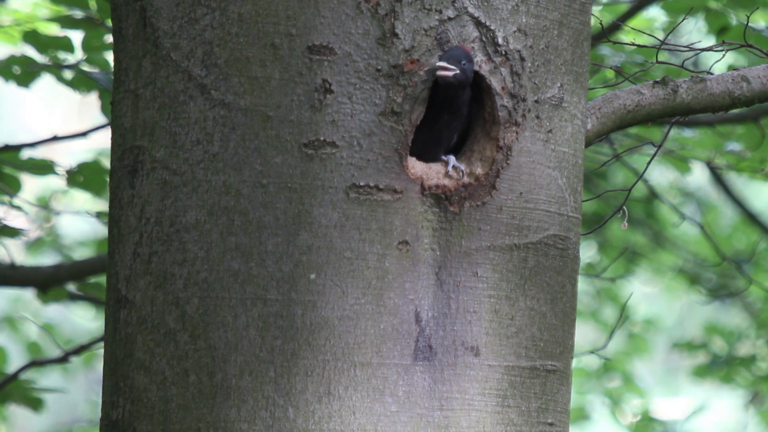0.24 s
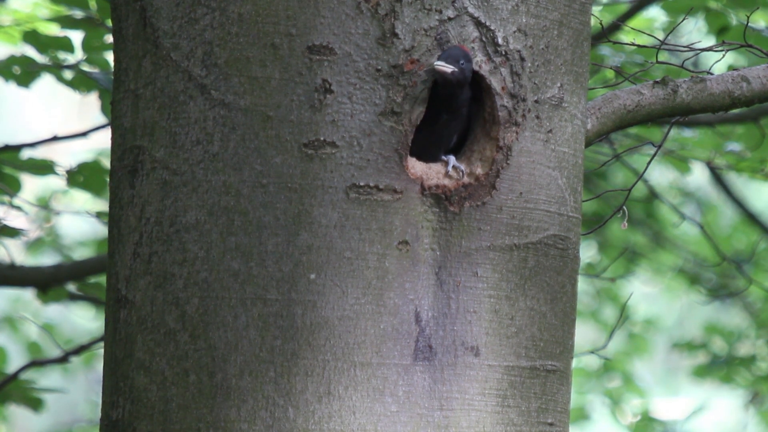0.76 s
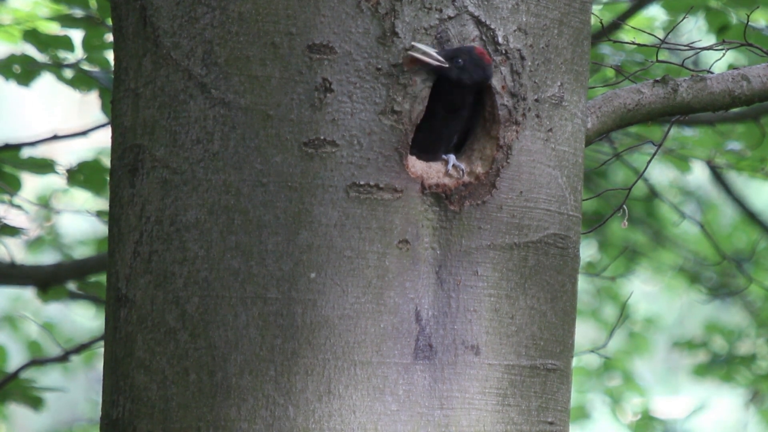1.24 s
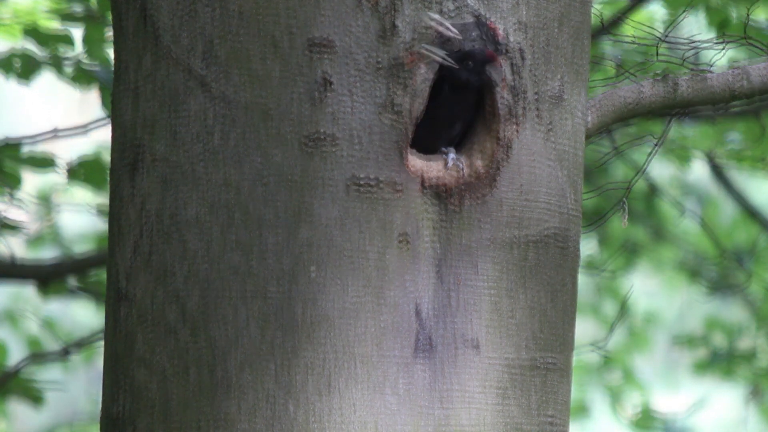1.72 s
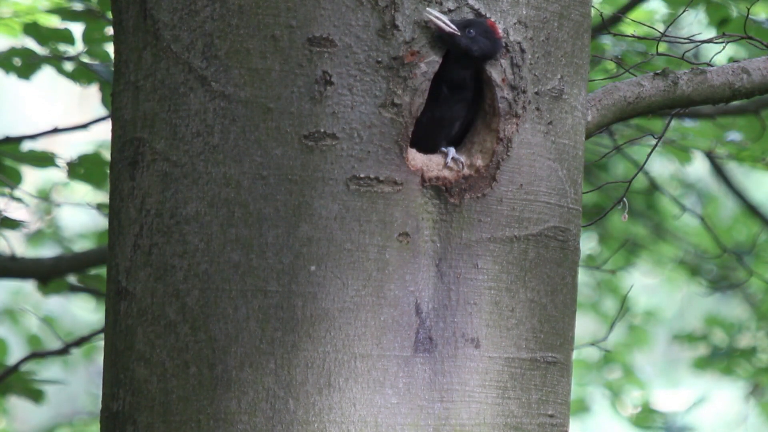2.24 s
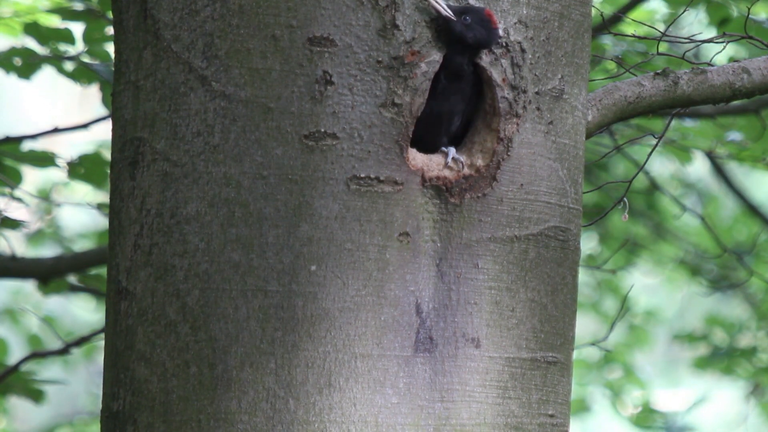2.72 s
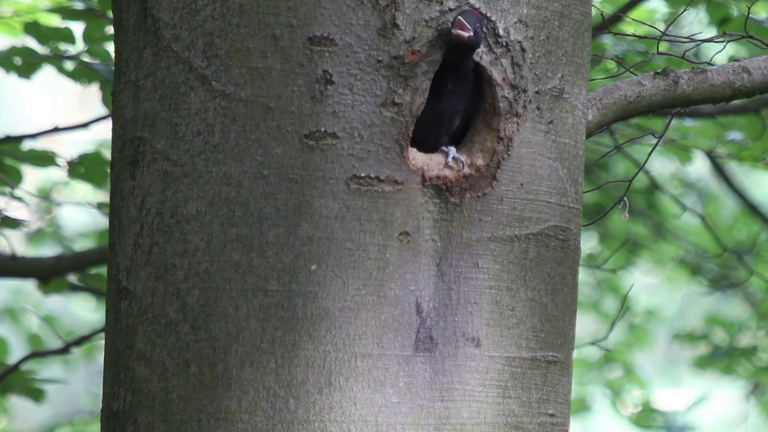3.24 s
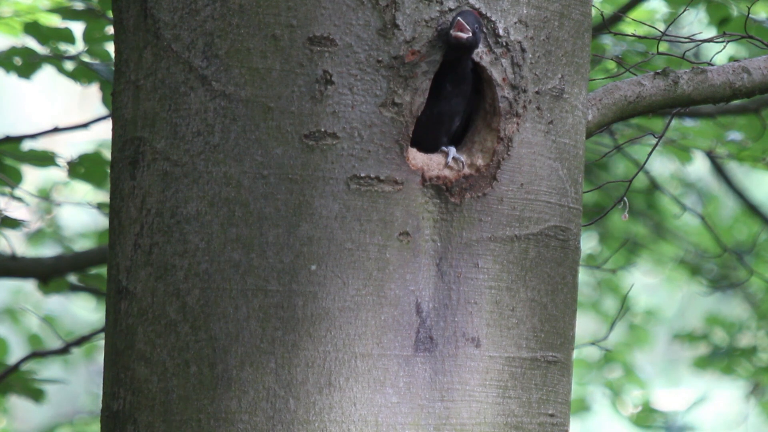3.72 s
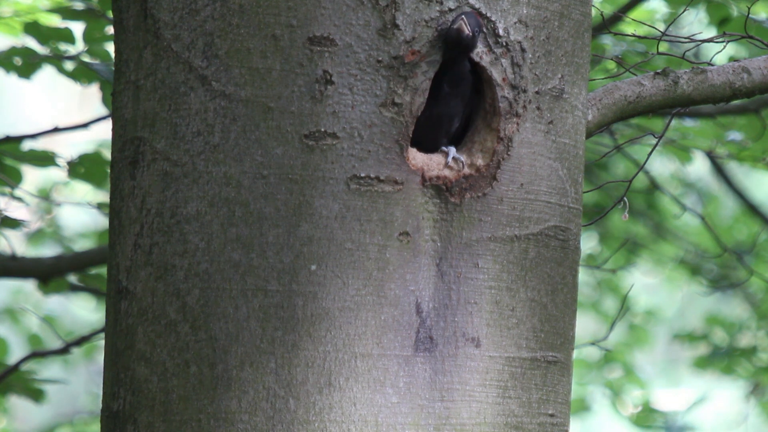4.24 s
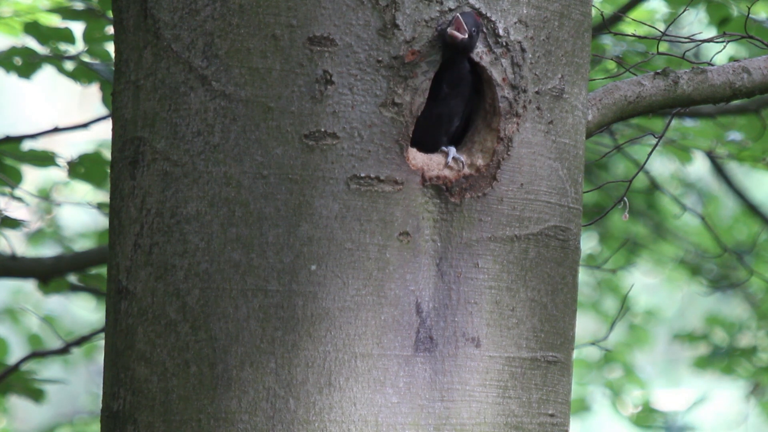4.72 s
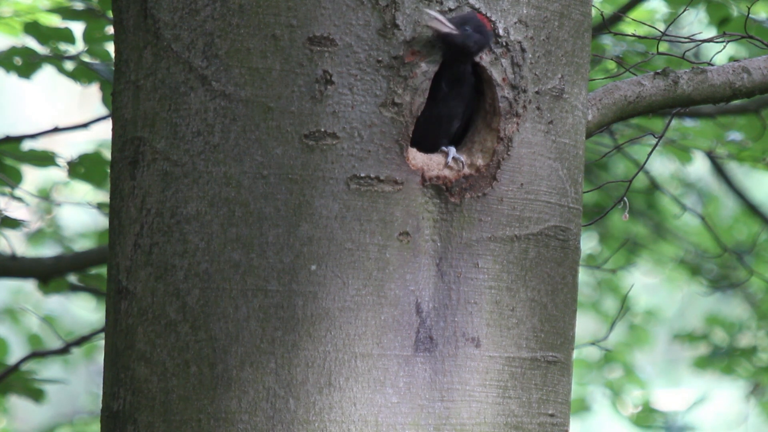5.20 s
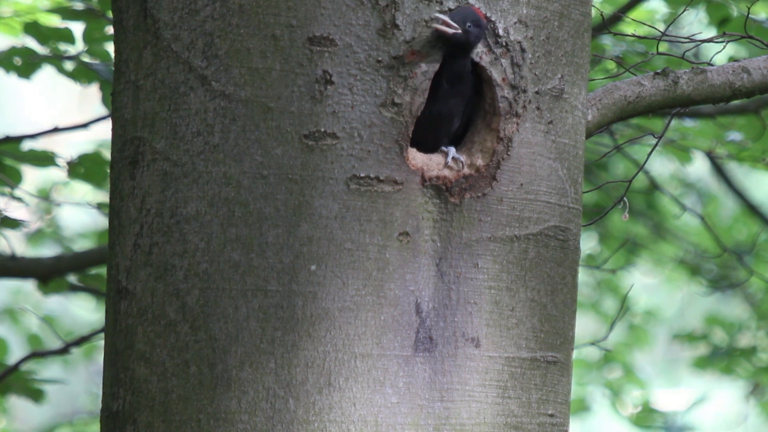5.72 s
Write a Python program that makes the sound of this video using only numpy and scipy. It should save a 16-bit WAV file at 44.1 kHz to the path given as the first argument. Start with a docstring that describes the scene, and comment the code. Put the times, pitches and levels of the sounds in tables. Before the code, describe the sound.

A quiet, reverberant beech wood, heard in mono for about six seconds. A finch is already mid-trill at the start, quick dipping notes, ending in a flourish at 0.55 and two sharp closing notes by 0.9. A blurred buzzy slur comes from deep in the wood near 1.0. From 1.7 to 2.6 a young woodpecker yelps five times: very short, harsh, nasal calls that break downward and turn raspy, with trunk echoes and soft blips after. The finch restarts with faint tsips at 1.9, then steady pip-and-falling slurs from 2.2 to 3.7, growing louder, a trill from 3.8, flourish at 4.7 and sharp notes around 5.0. A twig cracks sharply at 3.5, a weaker one at 4.3. Faint high warbling runs and husky low coos appear occasionally. Distant traffic rumble slowly recedes, with a wavering engine drone, light breeze, blurred birdsong and soft hiss.

```python
"""Woodpecker and finch in a beech wood

A young woodpecker yelps harshly from its hole: harmonics and rasp shaped by throat resonances.
A finch sings two phrases of gliding tones; a smaller bird, a buzzy far bird and a dove sound farther off.
Soft blips, single trunk echoes and a decaying noise tail fill the wood. Twigs snap, once loudly.
Shaped noise and a narrow engine band make distant traffic, under breeze, blurred birdsong and hiss."""
import sys
import numpy as np
from scipy import signal
from scipy.fft import rfft, irfft, next_fast_len
from scipy.io import wavfile
from scipy.ndimage import uniform_filter1d, map_coordinates

SR = 44100
rng = np.random.default_rng(int(sys.argv[2]) if len(sys.argv) > 2 else 0)


def wav_record(signal):
    """Record a signal, one row per channel, as 16-bit PCM in the file named by sys.argv[1]."""
    frames = np.transpose(np.atleast_2d(signal))
    bounded = np.clip(frames, -1, 1)
    # unit amplitude maps onto the largest positive 16-bit level
    quanta = np.round(bounded * 32767).astype(np.int16)
    wavfile.write(sys.argv[1], SR, quanta)


N = 262836
LEAD = SR // 4  # samples before time zero: the song is already under way


def amp(db):
    """Decibels to gain."""
    return 10 ** (np.asarray(db) / 20)


def unit(x):
    """Scale to rms 1."""
    return x / np.sqrt(np.mean(x ** 2) + 1e-20)


def along(points, hz):
    """Read (Hz, value) points on a log-frequency axis."""
    f, v = np.transpose(points)
    return np.interp(np.log(hz + 1), np.log(f + 1), v)


def curve(points):
    """Interpolate (s, value) points to one value per sample."""
    s, v = np.transpose(points)
    return np.interp(np.arange(N) / SR, s, v)


def wobble(rate_hz, size):
    """Smooth random curve through rate_hz normal-distributed knots a second."""
    knots = rng.standard_normal(int(size * rate_hz / SR) + 4)
    return map_coordinates(knots, [np.arange(size) * rate_hz / SR])


def filtered(x, response):
    """x times a response of frequency."""
    m = next_fast_len(len(x) + 8192)
    return irfft(rfft(x, m) * response(np.fft.rfftfreq(m, 1 / SR)), m)[:len(x)]


def noise(colour, size=N):
    """Noise of rms 1, coloured by (Hz, dB) points."""
    return unit(filtered(rng.standard_normal(size), lambda hz: amp(along(colour, hz))))


def add(track, start_s, sound):
    """Mix a sound into a track that begins LEAD samples early."""
    part = track[max(0, LEAD + round(start_s * SR)):][:len(sound)]
    part += sound[:len(part)]


def woodpecker(jitter=.012, broken_jitter=.022, shimmer_db=1.8, rasp=.28, wet_db=-4.5, harmonics=9):
    """Harsh falling yelps: harmonics slide through throat resonances and turn raspy as the pitch collapses."""
    # Yelps: (time [s], source level [dB], held pitch [Hz], end of hold after onset [s])
    yelps = [(1.711, -30.5, 1460, .017), (1.96, -33.5, 1688, 0.0055), (2.121, -30.5, 1680, .007),
             (2.367, -32.5, 1701, 0.0063), (2.5837, -30, 1704, .01)]
    # Throat resonances: (frequency [Hz], gain [dB])
    throat = [(700, -26), (1200, -3), (1700, -7.5), (2400, 5.5), (3000, -0.5), (3500, -7), (4400, -20),
              (5200, -20.5), (5900, -15.5), (6700, -21.5), (7400, -15.5), (9000, -37.5), (12000, -28),
              (16000, -50)]
    # Trunk echoes: (nominal delay [s], level [dB])
    trunks = [(.0255, -10.5), (.037, -15), (.047, -10)]
    # Settle on the held pitch, hold, break to a lower and weaker voice, sag to the end.
    yelp_s, settle_s, break_s = .029, 0.004035, 0.00398
    onset_hz, broken_hz, sag_hz = 1680, 1302, 976
    onset_db, broken_db, sag_db = -6, -6, -11
    # Resonances rise with (held pitch / rest pitch) ** throat_follows.
    throat_rest_hz, throat_follows = 1460, 0.37
    fundamental_db = -3.5  # the syrinx's first harmonic is weak

    track = np.zeros(LEAD + N)
    t = np.arange(int(yelp_s * SR)) / SR
    for s, db, held_hz, hold_s in yelps:
        stages_s = np.sort([0, settle_s, hold_s, hold_s + break_s, yelp_s])
        broken = np.interp(t, stages_s, [0, 0, 0, 1, 1])
        pitch_hz = np.interp(t, stages_s, [onset_hz, held_hz, held_hz, broken_hz, sag_hz])
        level_db = np.interp(t, stages_s, [onset_db, 0, 0, broken_db, sag_db])
        pitch_hz, phase, loud = syrinx(pitch_hz, level_db, jitter + broken_jitter * broken,
                                       shimmer_db * (1 + broken), rate_hz=891)
        shift = (held_hz / throat_rest_hz) ** throat_follows
        voice = np.zeros(len(t))
        for k in range(1, harmonics + 1):
            gain_db = along(throat, k * pitch_hz / shift) + fundamental_db * (k == 1)
            voice += amp(gain_db) * np.sin(k * phase)
        breath = unit(filtered(rng.standard_normal(len(t)), lambda f: amp(along(throat, f / shift))))
        growing_rasp = rasp * np.linspace(0, 2, len(t))
        call = amp(db) * loud * (voice + growing_rasp * breath)
        add(track, s, forest(hollow(call), direct_db=-2.5, wet_db=wet_db, build_s=0.012, echoes=trunks))
    return track[LEAD:]


def blips():
    """Soft, nearly pure downward blips: faint peeps, and echoes shortly after some yelps."""
    # Blips: (time [s], level before motif offset [dB], pitch ratio)
    blip_events = [(.018, -41, 0.96), (.198, -48, .92), (.447, -47.5, .93), (1.796, -39, 1),
                   (2.417, -42.5, 1), (2.638, -40.5, .98), (2.822, -49.5, 0.86)]
    # Downward blip: motif columns as in glides
    blip_motif = [(0.0019, 0.0044, 0.0118, 1920, 1810, 1610, 0.88, 1.5, 9, 5)]
    return whistler(glides(blip_motif, blip_events), jitter=0.028, shimmer_db=3.5,
                    scatter_db=-8.5, scatter_t60_s=0.39, wet_db=-4.0)


def hollow(sound, t60_s=.45, ring_db=-31):
    """The cavity behind the bird rings on faintly at a few pitches."""
    # Ring of the nest hollow: (frequency [Hz], level relative to ring_db [dB])
    modes = [(1745, -36), (2430, -31), (2550, -22.5)]
    t = np.arange(SR // 2) / SR
    ring = sum(amp(db) * np.sin(2 * np.pi * hz * t + wobble(39, len(t))) for hz, db in modes)
    ring *= amp(ring_db - 60 * t / t60_s)
    ring[0] += 1  # direct sound
    return signal.fftconvolve(sound, ring)


def syrinx(pitch_hz, db, jitter, shimmer_db, rate_hz):
    """Pitch, phase and loudness of one note; the membrane trembles at the given rate."""
    size = len(pitch_hz)
    pitch_hz = uniform_filter1d(pitch_hz, size=64) * (1 + jitter * wobble(rate_hz, size))
    loud = amp(db + shimmer_db * wobble(rate_hz, size)) * signal.windows.tukey(size, .1)
    return pitch_hz, 2 * np.pi * np.cumsum(pitch_hz) / SR, loud


def finch():
    """The finch's gliding tones, with trunk echoes."""
    # Trunk echoes: (nominal delay [s], level [dB])
    finch_trunks = [(.033, -18.5), (.047, -14)]
    return whistler(finch_song(), jitter=.012, shimmer_db=1.8, scatter_db=-8.5,
                    scatter_t60_s=.22, wet_db=-1.5, echoes=finch_trunks)


def finch_song():
    """Notes of the song: lead-in tsips, steady pips with sinking slurs, then trill, flourish and kits."""
    # Levels below are before each motif's own offset; motif columns as in glides.
    # Faint lead-in notes: (time [s], level [dB], pitch ratio)
    tsips = [(1.918, -53, 1.01), (2.06, -48.5, 1)]
    # Lead-in note: motif columns
    tsip_motif = [(0, .013, .011, 4900, 5150, 5350, 1, 1, 12, 7)]
    # Slurs: (time [s], level [dB])
    slurs = [(2.172, -47.5), (2.353, -46), (2.539, -43), (2.726, -40), (2.907, -40), (3.088, -40),
             (3.266, -39), (3.448, -38), (3.633, -36)]
    # A pip and a long fall: motif columns
    slur_motif = [(0, 0.0043, 0.012, 3950, 4320, 4400, 0.93, 2.5, 9.7, 9.2),
                  (.029, .026, .054, 6553, 3975, 2900, 1.08, 0.036, 6.9, 2.8)]
    # Trills: (start [s], stop [s], first period [s], lengthening per syllable [s], level [dB])
    trills = [(-.139, .47, .111, 0.0001, -35.5), (3.7975, 4.65, .1105, 0.0012, -34.5)]
    # A quick dip and an arch: motif columns
    trill_motif = [(0, .007, 0.0092, 5573, 4040, 3280, 1.04, -1, 19.7, 6.6),
                   (.028, .026, .019, 1948, 3257, 2062, 1.7, 0.4, 9, 10)]
    # Flourishes: (time [s], level [dB], pitch ratio)
    flourishes = [(.55, -35, 0.99), (4.731, -34.5, 0.96)]
    # Four-note flourish: motif columns
    flourish_motif = [(.003, 0.0136, 0.0042, 5200, 5750, 5100, 1, -0.5, 6.5, 10),
                      (.029, .014, .02, 4420, 5207, 3400, 0.94, 1, 1, 2.4),
                      (.079, .015, .005, 3350, 4100, 4450, 1, 4.5, 5.5, 8),
                      (.098, .014, .019, 3807, 2833, 2050, 0.98, -9.5, -6, 5)]
    # Sharp closing notes: (time [s], level [dB], pitch ratio)
    kits = [(.745, -39, 0.97), (.828, -39.5, 0.93), (4.927, -40, 0.96), (5.011, -41.5, 0.96)]
    # Two-part kit: motif columns
    kit_motif = [(.008, 0.0081, .012, 4640, 6740, 7460, 1, -8, -9, 3),
                 (.029, 0.00827, 0.0087, 5290, 6730, 4920, 0.91, -7, -16.5, -13.5)]
    first_ratio, sag_per_slur = 1.07, .014

    pip, fall = slur_motif
    steady = [(s, db, 1) for s, db in slurs]
    sinking = [(s, db, first_ratio - sag_per_slur * k) for k, (s, db) in enumerate(slurs)]
    parts = [(tsip_motif, tsips), ([pip], steady), ([fall], sinking),
             (trill_motif, repeats(trills, spread_db=0.35)),
             (flourish_motif, flourishes), (kit_motif, kits)]
    return [note for motif, events in parts for note in glides(motif, events)]


def glides(motif, events):
    """Start, pitch and level of each motif note, sung at every (s, dB, pitch ratio)."""
    # Motif columns: (onset [s], time to turn [s], time after turn [s], start [Hz], turn [Hz], end [Hz],
    # roundness (1 corner, 2 arch), level [dB], swell to turn [dB], fade after it [dB]);
    # Hz are before the pitch ratio; a negative swell or fade makes the turn the quiet point.
    for s, db, ratio in events:
        for onset, before, after, start_hz, turn_hz, end_hz, roundness, level, swell, fade in motif:
            lead = np.linspace(1, 0, int(abs(before) * SR) + 2)
            tail = np.linspace(0, 1, int(abs(after) * SR) + 2)
            approach_hz = (start_hz - turn_hz) * lead ** roundness
            departure_hz = (end_hz - turn_hz) * tail ** roundness
            pitch_hz = turn_hz + np.r_[approach_hz, departure_hz]
            yield s + onset, ratio * pitch_hz, db + level - np.r_[swell * lead, fade * tail]


def repeats(runs, spread_db, count=12):
    """The (s, dB, pitch ratio) of syllables in runs that keep time or slow down steadily."""
    k = np.arange(count)
    for start, stop, period, lengthening, db in runs:
        times = start + period * k + lengthening * k * (k - 1) / 2
        levels = db + spread_db * rng.standard_normal(count)
        yield from ((s, level, 1) for s, level in zip(times, levels) if s < stop)


def whistler(notes, jitter, shimmer_db, scatter_db, scatter_t60_s, wet_db, echoes=()):
    """Notes that are single gliding tones, heard through leaves and wood."""
    track = np.zeros(LEAD + N)
    for s, pitch_hz, db in notes:
        _, phase, loud = syrinx(pitch_hz, db, jitter, shimmer_db, rate_hz=393)
        note = foliage(loud * np.sin(phase), scatter_db, scatter_t60_s)
        add(track, s, forest(note, direct_db=-0.5, wet_db=wet_db, build_s=0.006, echoes=echoes))
    return track[LEAD:]


def foliage(sound, scatter_db, t60_s):
    """Leaves and twigs around a bird scatter part of its sound into a short blur of equal total energy."""
    t = np.arange(SR // 5) / SR
    blur = rng.standard_normal(len(t)) * amp(-60 * t / t60_s)
    blur *= amp(scatter_db) / np.linalg.norm(blur)
    blur[0] += 1
    return signal.oaconvolve(sound, blur / np.linalg.norm(blur))


def forest(sound, direct_db, wet_db, build_s, echoes=()):
    """Direct path, single trunk echoes, and a diffuse tail that swells in with time constant build_s."""
    # Decay of the wood: (frequency [Hz], t60 [s])
    wood = [(400, 4.6), (1800, 1.4), (3500, 1.46), (5500, 0.84), (8000, 0.92), (14000, .3)]
    hz, t, z = signal.stft(rng.standard_normal(SR), SR, nperseg=256)
    envelope = amp(-60 * t / along(wood, hz)[:, None]) * (1 - np.exp(-t / build_s))
    tail = signal.istft(z * envelope, SR, nperseg=256)[1]
    path = tail * amp(wet_db) * np.sqrt(2 * np.log(1000) / SR)  # unit energy for a 1 s t60
    path[0] += amp(direct_db)
    for delay_s, db in echoes:
        path[round(delay_s * rng.uniform(.92, 1.08) * SR)] += amp(db)
    return signal.fftconvolve(sound, path)


def warbler():
    """Runs of falling tones from a small bird high in the canopy."""
    # Runs: (start [s], stop [s], first period [s], lengthening per note [s], mean level before motif [dB])
    warbles = [(.105, .42, .125, 0, -53.5), (1.09, 1.73, .1175, 0, -56.5),
               (3.955, 4.72, .1175, 0.00046, -59), (5.238, 5.42, 0.11, 0, -53)]
    # Falling note: motif columns as in glides
    warbler_motif = [(0.0022, .008, 0.041, 5700, 5900, 3300, 0.99, -1, 6, 4.5)]
    return whistler(glides(warbler_motif, repeats(warbles, spread_db=3.0)), jitter=0.015, shimmer_db=3.5,
                    scatter_db=1, scatter_t60_s=0.1, wet_db=-14)


def far_bird(buzz_hz=260, scatter_db=7, wet_db=-.5):
    """A buzzy slur from deep in the wood: fast flutter spreads the tone, the long path blurs it."""
    # Calls: (time [s], level before motif offset [dB], pitch ratio)
    far_calls = [(.954, -43.5, 0.97)]
    # Two-part slur: motif columns as in glides
    far_motif = [(.004, 0.0462, 0.036, 2605, 2515, 2800, 0.91, -3, 3, 3.2),
                 (.08, .04, .17, 3350, 4153, 4540, 0.99, -.5, 2.4, 9.3)]
    track = np.zeros(LEAD + N)
    for s, pitch_hz, db in glides(far_motif, far_calls):
        _, phase, loud = syrinx(pitch_hz, db, jitter=0.016, shimmer_db=2.5, rate_hz=400)
        flutter = 2 * np.pi * np.cumsum(buzz_hz * wobble(500, len(phase))) / SR
        note = foliage(loud * np.sin(phase + flutter), scatter_db, t60_s=0.19)
        add(track, s, forest(note, direct_db=5, wet_db=wet_db, build_s=0.013))
    return track[LEAD:]


def dove(length_s=0.071, jitter=0.11):
    """Faint, short, far coos: low tones made husky by random pitch jitter."""
    # Coos: (centre time [s], level before the path [dB], mean pitch [Hz])
    coos = [(.04, -56, 403), (.19, -51.5, 402), (1.885, -56.5, 465), (1.99, -50.5, 466), (2.07, -55.5, 486),
            (2.18, -52, 453), (2.27, -54, 446), (5.605, -49.5, 463), (5.83, -55.5, 460), (5.93, -56, 455)]
    track, size = np.zeros(LEAD + N), int(length_s * SR)
    for s, db, hz in coos:
        phase = 2 * np.pi * np.cumsum(hz * (1 + jitter * wobble(190, size))) / SR
        add(track, s - length_s / 2, amp(db) * np.hanning(size) * np.sin(phase))
    return forest(track, direct_db=7, wet_db=-8, build_s=0.035)[LEAD:LEAD + N]


def twigs(snap_hz=6200, snap_t60_s=0.0018, rise_s=0.000053, crack=0.16, knock_db=-15, knock_t60_s=0.02):
    """Sharp snap (decaying tone and noise) with a dull woody knock of low noise that outlasts it."""
    # Snaps: (time [s], level [dB])
    snaps = [(3.359, -54), (3.471, -20), (4.170, -50), (4.264, -41)]
    knock_colour = [(150, -3), (400, 4), (1000, 0), (2500, -28), (8000, -60)]  # (Hz, dB)
    track, t = np.zeros(LEAD + N), np.arange(SR // 20) / SR
    for s, db in snaps:
        snap = np.sin(2 * np.pi * snap_hz * t) + crack * rng.standard_normal(len(t))
        snap *= amp(-60 * t / snap_t60_s)
        knock = noise(knock_colour, len(t)) * amp(knock_db - 60 * t / knock_t60_s)
        add(track, s, amp(db) * (1 - np.exp(-t / rise_s)) * (snap + knock))
    return track[LEAD:]


def chorus():
    """Blurred far birds: coloured noise with a wandering level."""
    # Level: (time [s], level [dB])
    chorus_level = [(0, -48.5), (.3, -56.5), (1.3, -73), (3.2, -68.5), (3.45, -53.5), (3.8, -63.5),
                    (5.35, -60.5), (5.55, -56), (5.96, -60.5)]
    # Colour: (frequency [Hz], relative density [dB per Hz])
    chorus_colour = [(1100, -15), (1700, -3.5), (2100, -4), (2700, -3), (3500, 0.5), (4500, -40),
                     (7000, -42)]
    return amp(curve(chorus_level) + 3.1 * wobble(14, N)) * noise(chorus_colour)


def traffic(rumble_db=-52, recede_db_per_s=0.55, swell_db=2):
    """Distant traffic: slowly receding, swelling low noise plus the engines."""
    # Colour: (frequency [Hz], relative density [dB per Hz])
    rumble_colour = [(10, 3), (30, -11), (52, -8), (105, 3.5), (150, -7.5), (260, -50)]
    level_db = rumble_db - recede_db_per_s * np.arange(N) / SR + swell_db * wobble(6, N)
    return amp(level_db) * noise(rumble_colour) + engines()


def engines(offset_db=-2.0, contrast=1.3, width_hz=85):
    """Far engine note, smeared into a narrow band by the many paths through the wood."""
    # Pitch: (time [s], centre [Hz])
    drone_pitch = [(0, 250), (.6, 210.4), (1, 205.9), (1.6, 165.2), (3, 190), (4.1, 168.3), (4.85, 184.8),
                   (5.2, 150), (5.96, 179.4)]
    # Level before contrast and offset: (time [s], level [dB])
    drone_level = [(0.0, -53.5), (0.61, -54), (0.62, -46.5), (1.46, -56), (1.64, -49), (2.27, -60),
                   (3.79, -51), (3.86, -57), (4.16, -46.5), (4.54, -59), (4.91, -46.5), (4.99, -56),
                   (5.13, -49), (5.9, -62)]
    level_db = curve(drone_level)
    level_db = level_db.mean() + contrast * (level_db - level_db.mean()) + offset_db
    phase = 2 * np.pi * np.cumsum(curve(drone_pitch)) / SR
    band = wobble(width_hz, N) * np.sin(phase) + wobble(width_hz, N) * np.cos(phase)
    return amp(level_db) * unit(band)


def breeze(level_db=-48.5):
    """Light breeze: coloured noise with a slightly unsteady level."""
    # Colour: (frequency [Hz], relative density [dB per Hz])
    breeze_colour = [(20, -8), (35, -12), (52, 8.5), (100, 0.5), (200, -1.5), (300, -2), (400, -5.5),
                     (500, -9), (610, -4), (750, -8.5), (1200, -9), (1700, -16.5), (2200, -21),
                     (4000, -15.5), (7000, -27.5), (12000, -49)]
    return amp(level_db + 0.62 * wobble(8, N)) * noise(breeze_colour)


def hiss(level_db=-60.0):
    """Steady white microphone hiss."""
    return amp(level_db) * rng.standard_normal(N)


def scene():
    """All the birds at their distances, over the background."""
    birds = woodpecker() + blips() + finch() + warbler() + far_bird() + dove()
    background = chorus() + traffic() + breeze() + hiss()
    return (birds + twigs() + background)[None]


def record(dry, top_hz=15800):
    """Remove everything from the band limit up."""
    return np.array([filtered(channel, lambda hz: hz < top_hz) for channel in dry])


dry = scene()
out = record(dry)
wav_record(out)
```